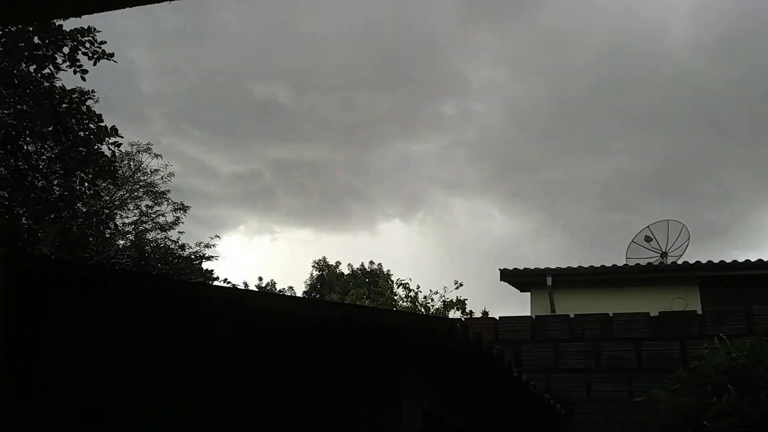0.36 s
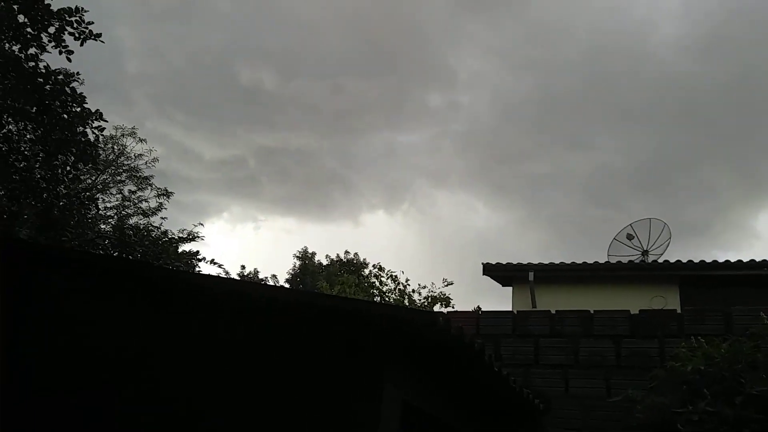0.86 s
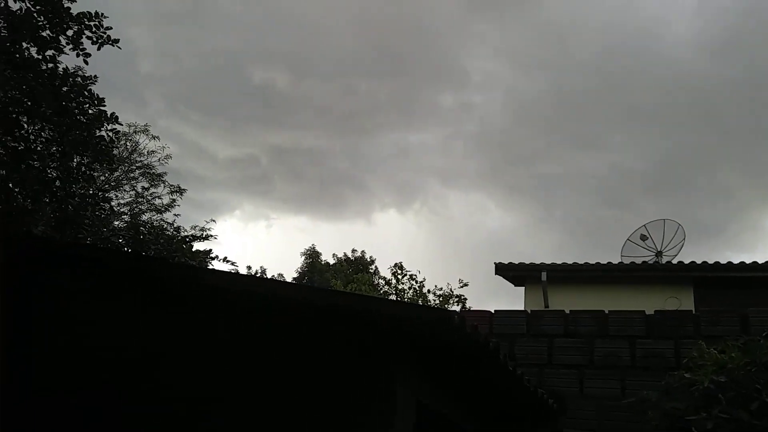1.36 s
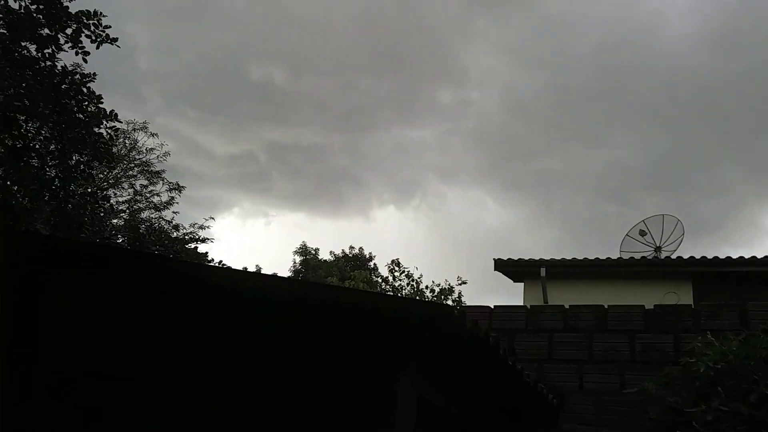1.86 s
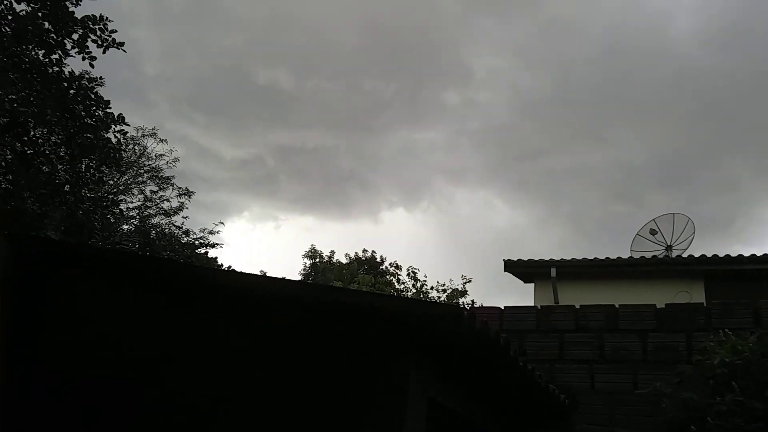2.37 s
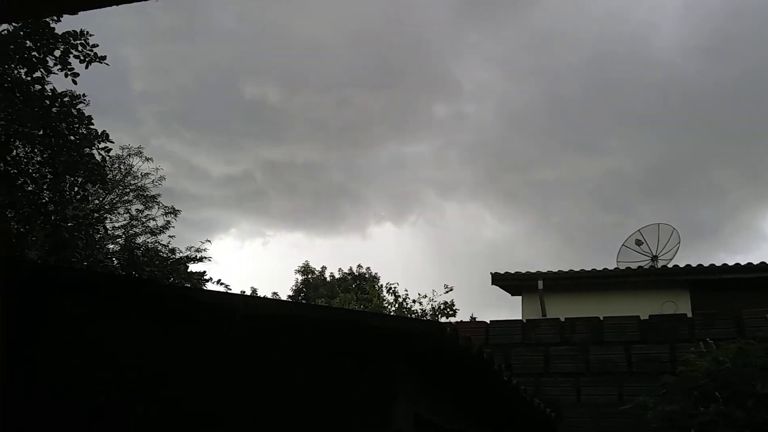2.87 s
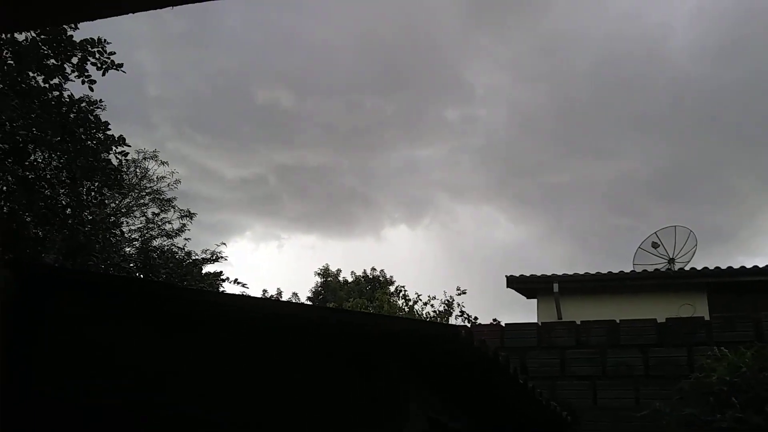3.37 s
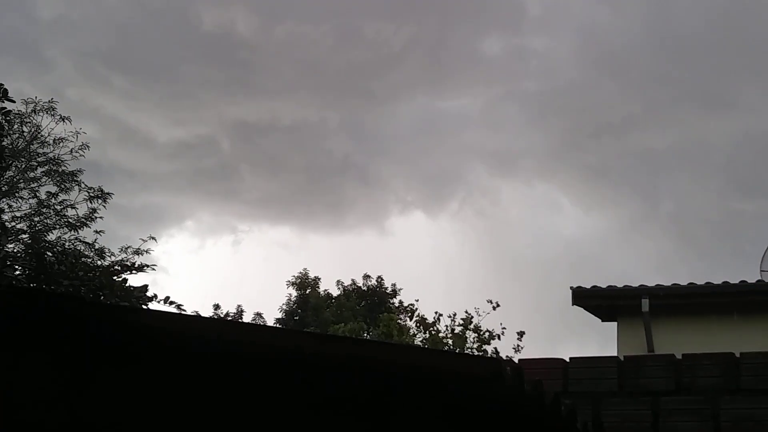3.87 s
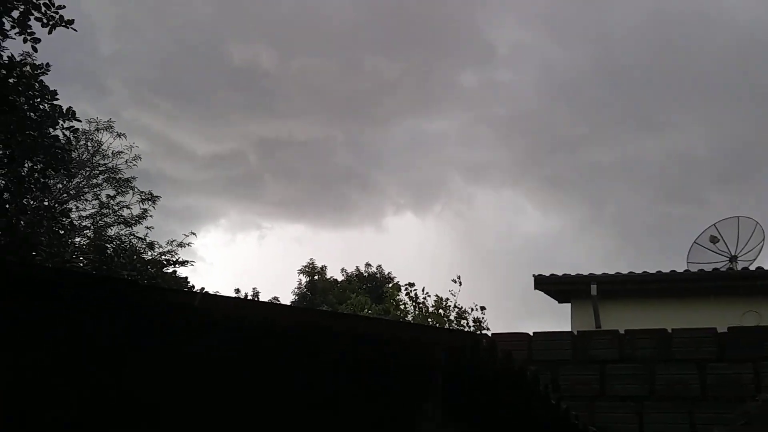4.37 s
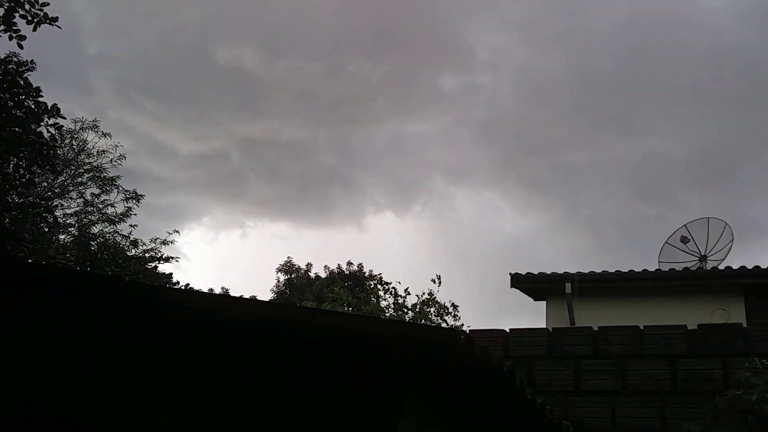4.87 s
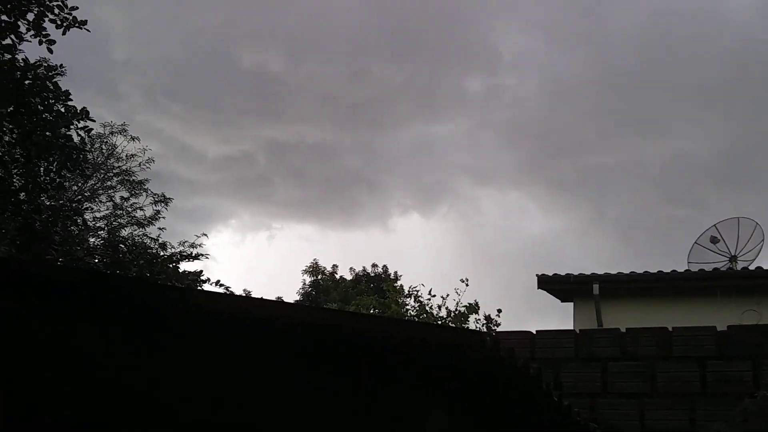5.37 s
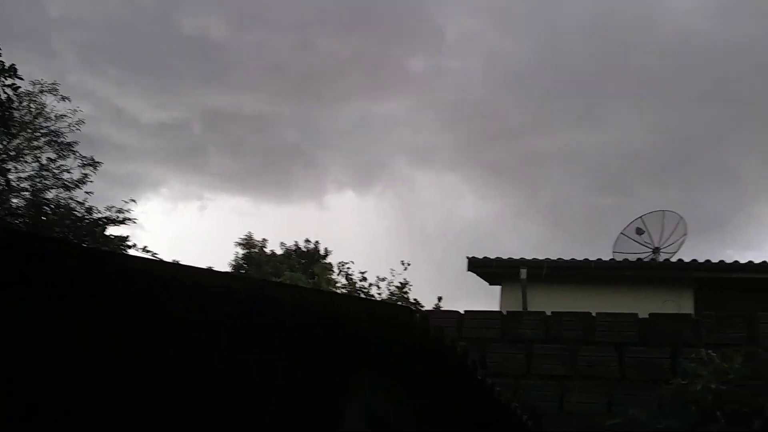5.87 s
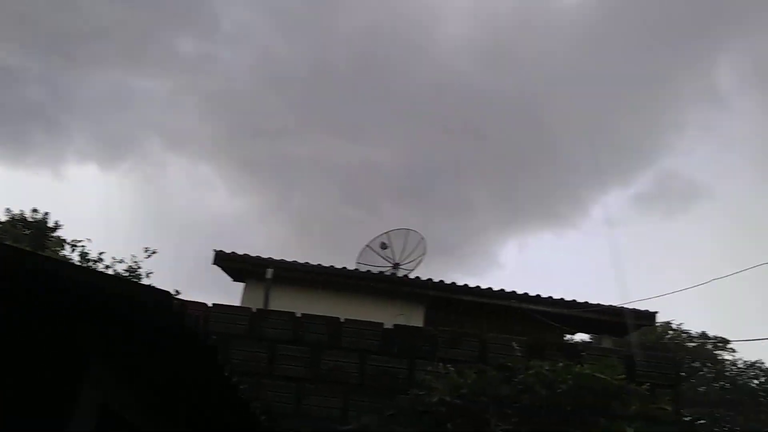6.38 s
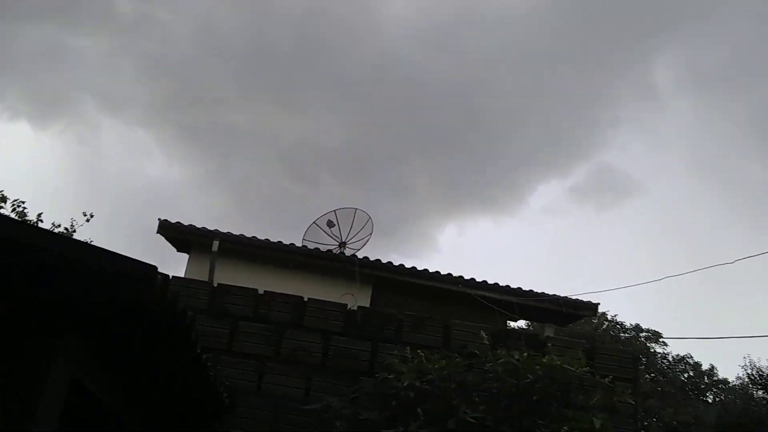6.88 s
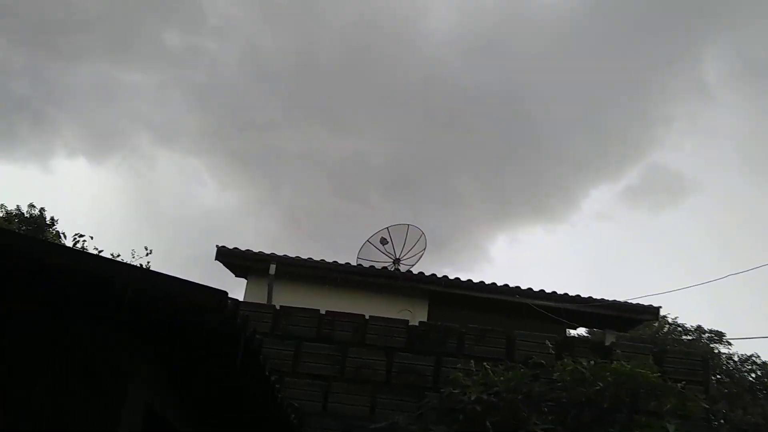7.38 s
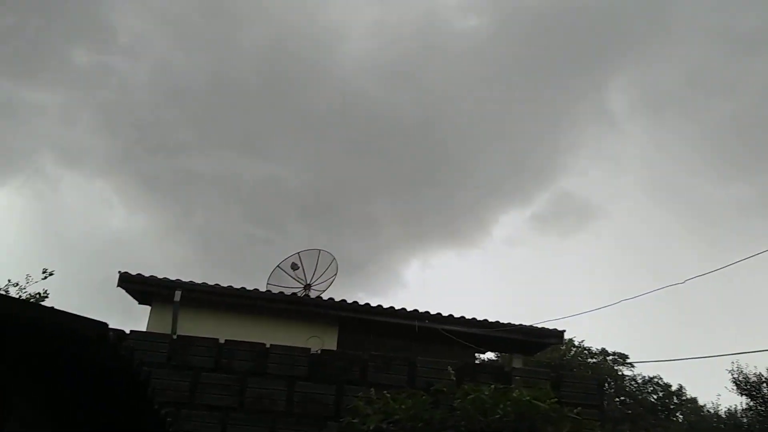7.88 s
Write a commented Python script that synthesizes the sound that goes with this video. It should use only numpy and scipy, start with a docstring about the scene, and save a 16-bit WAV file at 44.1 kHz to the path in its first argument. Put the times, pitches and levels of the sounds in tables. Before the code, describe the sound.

Steady heavy rain hisses and roars around a house, with sharp close drops, hollow drips, brief wind buffeting and a small bird cheeping regularly.

```python
"""Heavy rain from under the eaves

Rain on roofs, a wall and leaves, heard by a handheld phone with a port at each end, wired with opposite signs.
Shaped noise makes the far roar, thousands of tiny ticks the patter, short damped rings the close drops and drips.
A small bird, a hoarse stack of overtones, cheeps in time; gusts of low noise and single slaps buffet the ports.
The phone's gain control starts low, ducks just after loud peaks and creeps back."""
import sys
import numpy as np
from scipy import signal
from scipy.fft import rfft, irfft
from scipy.io import wavfile
from scipy.ndimage import uniform_filter1d

SR = 44100
rng = np.random.default_rng(int(sys.argv[2]) if len(sys.argv) > 2 else 0)


def invert_db(x):
    """Field ratio 10**(x/20) for x, a level in decibels (scalar or array-like)."""
    u = np.asarray(x, float) / 20
    return 10 ** u


def output_pcm(signal):
    """Save a mono or channel-first signal as 16-bit PCM at the path in sys.argv[1].

    Samples are clipped to [-1, 1] before scaling.
    """
    pcm = np.clip(np.atleast_2d(signal).T, -1, 1) * 32767
    wavfile.write(sys.argv[1], SR, np.round(pcm).astype(np.int16))


N = 363472
T = np.arange(N) / SR  # seconds
HZ = np.fft.rfftfreq(N, 1 / SR)
PORT_LAG_S = 0.0004536  # sound's walk along the phone


def unit(x):
    """Scale to rms 1."""
    return x / np.sqrt(np.mean(x ** 2))


def colour(x, points, lag_s=0.):
    """Shape the spectrum by (Hz, dB) points, straight lines over log frequency, and delay it."""
    hz, db = np.transpose(points)
    gain = invert_db(np.interp(np.log(HZ + 1), np.log(hz), db))
    delay = np.exp(-2j * np.pi * HZ * lag_s)
    return irfft(rfft(x) * gain * delay, N)


def walk(rate):
    """Random levels held 1 / rate s and slewed twice; spread near 1."""
    hold = int(SR / rate)
    steps = np.repeat(rng.standard_normal(N // hold + 1), hold)
    return 1.83 * uniform_filter1d(uniform_filter1d(steps, hold), hold)[:N]


def add(out, burst, s, pan_db=0., late_s=PORT_LAG_S):
    """One sound reaches both ports, the right one late_s later; the right port is wired with opposite sign."""
    left_start, right_start = s + max(-late_s, 0), s + max(late_s, 0)
    for side, sign, start in ((0, 1, left_start), (1, -1.07, right_start)):
        i = int(round(start * SR))
        part = burst[max(-i, 0):max(N - i, 0)]
        i = max(i, 0)
        out[side, i:i + len(part)] += sign * invert_db(min(sign * pan_db, 0)) * part


def swell(db, bursts):
    """A base level in dB with bursts on top, each quick to rise and slower to fall; powers add."""
    power = invert_db(db) ** 2
    for s, level_db, ms in bursts:
        since = (T - s) / (ms / 1000) + 0.051
        shape = np.exp(-.5 * (since / np.where(since < 0, .25, .55)) ** 2)
        power = power + invert_db(level_db) ** 2 * shape
    return 10 * np.log10(power)


def roar(db, right_db=-1.5, blur_hz=9600.0, bend_rad=2.41, offset_hz=60.0):
    """Far rain from both ends of the yard; short waves scatter round the phone and lose their likeness."""
    # colour of the far rain. Each row: frequency in Hz, relative level in dB per Hz
    roar_colour = [(35, -27), (60, -18.5), (200, -6), (400, -1.5), (650, 0), (900, -1), (1250, -6),
                   (2300, -7.5), (4300, -8.5), (7000, -12.5), (14000, -20.5)]
    left, right, loose = (rng.standard_normal(N) * invert_db(1.19 * walk(16)) for _ in range(3))
    right = right * invert_db(right_db)
    # long waves keep a fixed phase step between the ports, short ones the walk along the phone
    walk_lag_s = PORT_LAG_S * (1 - offset_hz / (HZ + 300))
    lag_s = np.maximum(walk_lag_s, bend_rad / (2 * np.pi * (HZ + 40)))
    alike = np.exp(-(HZ / blur_hz) ** 4)
    at_left = colour(left, roar_colour) + colour(right, roar_colour, lag_s)
    shared = rfft(colour(left, roar_colour, lag_s) + colour(right, roar_colour))
    other = rfft(colour(loose, roar_colour)) * np.hypot(1, invert_db(right_db))
    at_right = -irfft(np.sqrt(alike) * shared + np.sqrt(1 - alike) * other, N)
    return invert_db(db + 1.5) * unit(np.array([at_left, at_right]))


def patter(db, per_s=2500, scatter_db=-1.0, lag_spread=0.93, mist_db=-2.5):
    """Countless small drops, each from its own angle on the left, ring the ports over a fine mist."""
    # how each port colours close spray. Each row: frequency in Hz, gain in dB
    left_ring = [(1000, -90), (5000, -15), (8000, -4), (9600, 3), (10600, 0.5), (11600, -5.5), (13500, -15),
                 (15000, -40)]
    right_ring = [(1000, -83), (5000, -13.5), (8000, -8.5), (9600, 0), (10600, -1.5), (11600, -2),
                  (13500, -11), (15000, -22)]
    count = int(per_s * N / SR)
    chance = rng.random((count, 2))
    at = (chance[:, 0] * N).astype(int)
    size = invert_db(-scatter_db * np.log(chance[:, 1] + 0.03)) * rng.choice([-1, 1], count)
    # lag_spread is in samples
    late = np.round(PORT_LAG_S * SR + lag_spread * rng.standard_normal(count)).astype(int)
    left_ticks = np.bincount(at, size, N)
    right_ticks = -np.bincount(np.minimum(at + late, N - 1), size, N)
    mist = rng.standard_normal((2, N)) * invert_db(1.3 * walk(18))
    wet = unit(np.array([left_ticks, right_ticks])) + invert_db(mist_db) * mist
    return invert_db(db) * unit(np.array([colour(wet[0], left_ring), colour(wet[1], right_ring)]))


def wind(db, turns=0.52, edge_db=-12.0, loose_db=-16):
    """Low flutter pressing on both ports at once, and single slaps a few sharp-edged swings long."""
    # colour of the flutter. Each row: frequency in Hz, relative level in dB per Hz
    wind_colour = [(25, -13), (70, 14), (130, 7.5), (250, -2.5), (500, -11), (1500, -51)]
    # gusts slapping the ports. Each row: middle in seconds, main swing's peak in dB, mid-slap frequency in Hz
    slap_rows = [(0.01, -7.5, 148), (.09, -7.5, 121), (.145, -6, 110), (.18, -9, 180), (.21, -10, 150),
                 (.227, -3, 272), (0.246, -4, 170), (.267, -11, 220), (.285, -9, 120), (0.36, -10, 223),
                 (.382, -12, 130), (1.63, -16, 127), (1.678, -7, 198), (1.715, -21, 166), (1.814, -17, 113),
                 (5.033, -23, 150)]
    flutter = colour(rng.standard_normal(N) * invert_db(4.5 * walk(30)), wind_colour)
    # a fainter flutter of equal sign in both channels, its lowest part removed
    loose = colour(rng.standard_normal(N), wind_colour)
    loose = unit(loose - uniform_filter1d(loose, size=500))
    out = invert_db(db) * (unit(flutter) * np.array([[1], [-1]]) + invert_db(loose_db) * loose)
    for s, peak_db, hz in slap_rows:
        t = T[:SR // 15] - 1 / 30
        swing = 2 * np.pi * hz * t * (1 - 14 * t) + rng.random()  # falls in pitch
        envelope = np.exp(-.5 * (t * hz / turns) ** 2)
        slap = envelope * (np.sin(swing) + invert_db(edge_db) * np.sin(2 * swing))
        add(out, invert_db(peak_db) * slap, s - 1 / 30, 1.5, .0004)
    return out


def knocks(ring_s=0.0044, upper=1.45, upper_db=-2.5, spread_db=4.0, late_s=0.00076):
    """Heavy drips on something hollow: two low damped rings for each drip."""
    # the heavy drips. Each row: start in seconds, peak in dB, lower ring in Hz
    knock_rows = [(1.72, -18.5, 415), (1.98, -28, 490), (3.053, -10, 625), (5.031, -21, 600),
                  (7.1, -30, 600), (7.125, -29, 517), (7.51, -28.5, 450), (7.884, -27, 458),
                  (7.956, -20, 480)]
    # lesser drips at random moments: loudest in dB, middle ring in Hz
    per_s, loudest_db, middle_hz = 16, -29.5, 600
    out, t = np.zeros((2, N)), T[:SR // 20]
    chance = rng.random((int(per_s * N / SR), 3))
    lesser = [(u * T[-1], loudest_db + spread_db * np.log(1 - v), middle_hz * 2 ** (1.6 * (w - .5)))
              for u, v, w in chance]
    for s, db, hz in [*knock_rows, *lesser]:
        ring = np.sin(2 * np.pi * hz * t) + invert_db(upper_db) * np.sin(2 * np.pi * upper * hz * t)
        ring = ring * t * np.exp(-t / ring_s)
        add(out, invert_db(db) * ring / np.abs(ring).max(), s, 1.0, late_s)
    return out


def drops(crack=0.26, ring_s=0.00032, tail_db=-14, tail_s=0.0053):
    """A short ring, longer for deep drops, a crack of noise in the same range and a faint spatter after."""
    # single close drops. Each row: start in seconds, peak in dB ahead of the spatter, ring in Hz,
    # nearer end of the phone (1 left, -1 right)
    drop_rows = [(.6961, -4.5, 9700, 1), (.9984, -3.5, 9700, 1), (1.0126, -6, 6500, 1),
                 (1.0148, -6, 2600, 1), (1.0153, -1, 6100, 1), (2.017, -12, 9000, 1),
                 (2.0243, -3.5, 15500, 1), (2.1241, 2, 9800, 1), (2.56, -6, 10000, 1),
                 (2.9949, -6, 11800, 1), (3.0531, -6, 1700, -1), (3.0529, 4, 750, -1),
                 (3.7252, -10.5, 9600, 1), (4.4562, -11.5, 9700, 1), (4.4565, -15, 4900, 1),
                 (4.7362, -12.5, 5500, 1), (5.097, -14, 9300, -1), (5.1202, -5, 14500, 1),
                 (5.3118, -6, 12000, 1), (5.4209, -10, 4900, 1), (5.5154, -12.5, 9700, 1),
                 (6.1163, -7, 9300, 1), (6.4231, -12, 11300, 1), (6.6637, -2, 10500, 1),
                 (7.5531, -16, 10000, 1), (7.954, -14, 4900, 1), (7.955, -7.5, 10200, 1),
                 (8.2115, -9, 9700, 1)]
    # balance of a drop between the ports. Each row: ring in Hz, left minus right in dB
    drop_balance = [(2000, 1), (6000, 2.5), (9500, 4), (10500, 3), (11500, -3)]
    # lesser drops at random moments: loudest and scatter in dB
    per_s, loudest_db, spread_db = 5, -16.5, 1
    out, t = np.zeros((2, N)), T[:SR // 25]
    chance = rng.random((int(per_s * N / SR), 3))
    stray = [(u * T[-1], loudest_db + spread_db * np.log(1 - v), 6156.8 + 1443 * w, 1) for u, v, w in chance]
    for s, db, hz, end in [*drop_rows, *stray]:
        fade = t / (ring_s * (10000 / hz) ** .24)  # ring_s holds at 10 kHz
        band = signal.butter(1, [hz / 2, min(3.64 * hz, 15000)], "band", fs=SR, output="sos")
        noise = unit(signal.sosfilt(band, rng.standard_normal((2, len(t)))))
        burst = np.sqrt(fade) * np.exp(-fade) * (-np.sin(2 * np.pi * hz * t) + crack * noise[0])
        spatter = np.exp(-t / tail_s) * np.minimum(fade / 3, 1) * noise[1]
        burst = burst / np.abs(burst).max() + invert_db(tail_db) * spatter
        pan_db = np.interp(hz, *np.transpose(drop_balance))
        add(out, invert_db(db) * burst, s, pan_db, end * PORT_LAG_S)
    return out


def bird(fall=0.0235, hoarse=0.0374, echo_s=0.04, rasp_db=-5.0):
    """A hoarse stack of overtones that sags in pitch, with a high rasp, smeared by the yard."""
    # the cheeps. Each row: start in seconds, level of the overtones in dB ahead of the swell and fade,
    # length in ms, mean base pitch in Hz
    cheep_rows = [(.475, -21.5, 45, 1836), (1.35, -20.5, 76, 1835), (2.209, -27, 76, 1820),
                  (3.015, -26.5, 51, 1807), (3.855, -26, 54, 1793), (4.72, -26, 73, 1816),
                  (5.564, -25.5, 57, 1810), (6.425, -30.5, 48, 1808), (7.345, -31.5, 58, 1793),
                  (8.201, -28.5, 120, 1870)]
    # partials of the call. Each row: multiple of the base pitch, relative level in dB
    cheep_partials = [(1.941, -6.5), (3.001, -1.5), (3.848, -2.5), (5, -5), (6, -0.5)]
    out = np.zeros((2, N))
    for s, db, ms, hz in cheep_rows:
        t = T[:int(ms / 1000 * SR)]
        u = t / t[-1]
        wobble = unit(uniform_filter1d(rng.standard_normal(len(t)), size=40))
        phase = 2 * np.pi * np.cumsum(hz * (1 + fall * (.5 - u) + hoarse * wobble)) / SR
        overtones = unit(sum(invert_db(d) * np.sin(k * phase) for k, d in cheep_partials))
        band = signal.butter(2, [5510, 9690], "band", fs=SR, output="sos")
        rasp = invert_db(rasp_db) * unit(signal.sosfilt(band, rng.standard_normal(len(t))))
        call = (overtones + rasp) * np.sin(np.pi * u ** 0.57)
        yard = rng.standard_normal(SR // 8) * np.exp(-T[:SR // 8] / echo_s) * invert_db(-30.5)
        yard[0] = 1  # the direct call
        add(out, invert_db(db) * signal.fftconvolve(call, yard), s, 1.5)
    return out


def scene():
    """Rain far and near, drips, the bird and the wind; roar, patter and breeze follow one level curve."""
    # level of the rain ahead of the gain control below, lower toward the end.
    # Each row: time in seconds, level in dB (roar() adds 1.5)
    rain_level = [(0, -29.5), (.9, -29), (1.05, -27.5), (1.4, -25.5), (1.9, -30), (2.3, -31), (2.9, -33),
                  (3.5, -33), (3.9, -34.5), (4.1, -34), (4.3, -34), (5.0, -31.5), (5.4, -32), (5.9, -33.5),
                  (5.97, -35), (6.6, -36.5), (7.0, -38.5), (7.6, -38.5), (7.9, -36.5), (8.24, -38.5)]
    # the roar swells briefly. Each row: moment in seconds, level in dB (roar() adds 1.5), time scale in ms
    surge_rows = [(1.2, -27.5, 210), (1.69, -26, 167), (4.36, -35, 64), (5.04, -36, 24), (5.87, -35, 79),
                  (6.5, -36, 66), (7.11, -35, 22), (7.92, -37, 140)]
    # handfuls of spray landing close by. Each row: moment in seconds, level in dB, time scale in ms
    splash_rows = [(.22, -33, 24), (.375, -27, 16), (0.906, -33, 33), (1.014, -19.5, 39), (1.205, -31, 31),
                   (1.594, -22, 19), (1.69, -28.5, 260), (2.0, -33, 100), (2.445, -22.5, 43),
                   (3.425, -23.5, 28), (4.025, -44, 38), (4.355, -35, 64), (5.425, -26.5, 24),
                   (5.925, -26, 44), (6.795, -39, 28), (7.415, -35, 40), (7.95, -32, 32)]
    # gusts. Each row: moment in seconds, level in dB, time scale in ms
    gust_rows = [(.02, -23, 130), (.18, -19, 170), (.36, -27, 80), (1.68, -24.5, 96), (1.81, -31, 74),
                 (5.04, -45, 74)]
    patter_db, breeze_db = 1.5, -21.5  # against the level curve
    rain_db = np.interp(T, *np.transpose(rain_level))
    far = roar(swell(rain_db, surge_rows))
    near = patter(swell(rain_db + patter_db, splash_rows))
    air = wind(swell(rain_db + breeze_db, gust_rows))
    return far + near + air + knocks() + drops() + bird()


def low_pass(x):
    """Removes everything above the highest recorded frequency."""
    return signal.sosfilt(signal.butter(12, 15130, fs=SR, output="sos"), x)


def record(dry):
    """Gain control: a peak over the top pulls the gain down a moment later; it climbs back evenly in dB."""
    top_db, start_db = -10.5, 10.5  # highest untouched peak; gain reduction at the start
    recover_db_s, late_s = 11, 0.0034  # climb in dB per second; delay in seconds
    # the control hardly senses the low flutter
    sensed = signal.sosfilt(signal.butter(4, 450, "high", fs=SR, output="sos"), dry)
    over_db = 20 * np.log10(np.abs(sensed).max(axis=0) + 1e-9) - top_db
    over_db[0] = start_db
    climb_db = recover_db_s * T
    held_db = np.maximum(np.maximum.accumulate(over_db + climb_db) - climb_db, 0)
    late = int(late_s * SR)
    duck_db = uniform_filter1d(np.r_[np.full(late, start_db), held_db[:-late]], size=30)
    clipped = np.clip(dry * invert_db(-duck_db), -1, 1)
    treble_limit = signal.ellip(8, .3, 45, 14200, fs=SR, output="sos")
    return low_pass(signal.sosfilt(treble_limit, clipped))


dry = scene()
out = record(dry)
output_pcm(out)
```